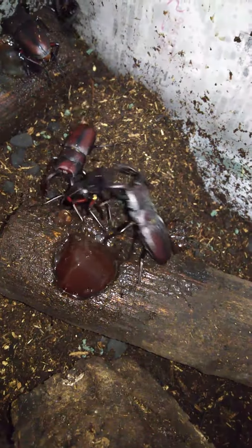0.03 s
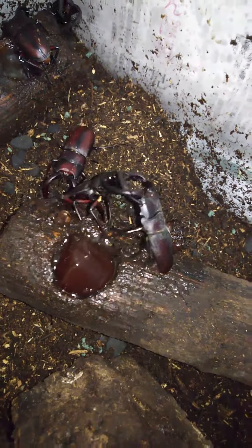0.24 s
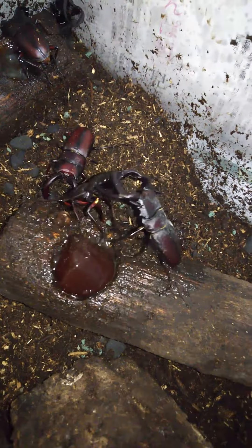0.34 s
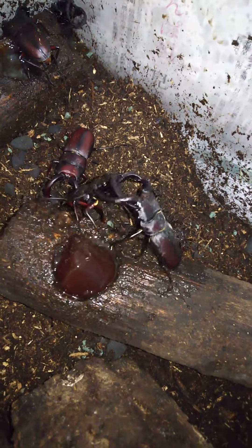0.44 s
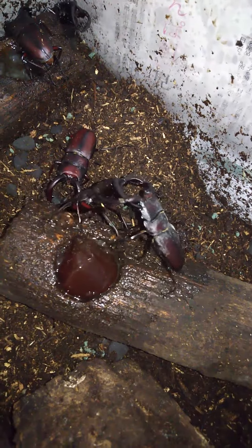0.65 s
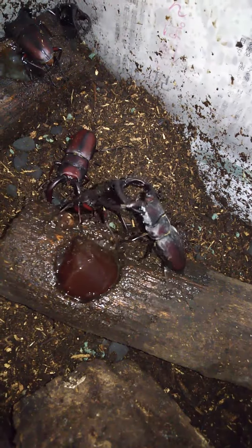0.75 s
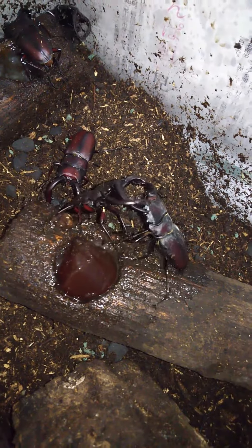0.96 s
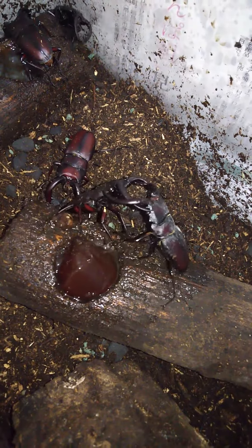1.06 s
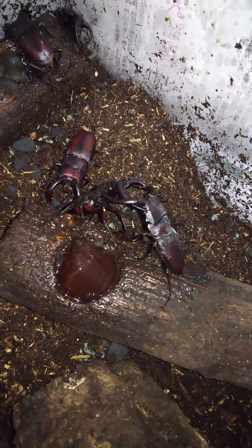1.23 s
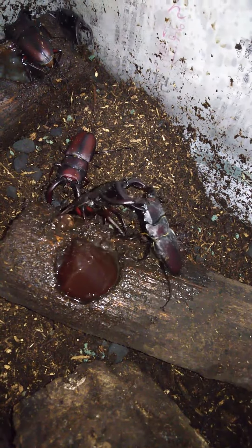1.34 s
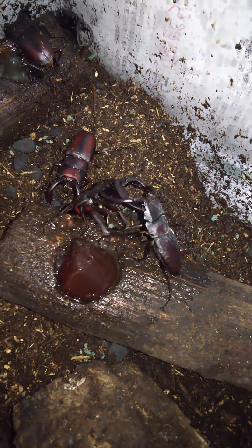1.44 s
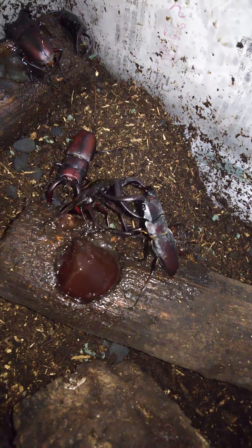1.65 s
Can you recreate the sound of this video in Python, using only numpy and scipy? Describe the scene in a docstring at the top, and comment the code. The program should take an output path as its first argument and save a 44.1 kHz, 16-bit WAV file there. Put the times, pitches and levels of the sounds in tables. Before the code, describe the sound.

Dry snaps and small clicks of two beetles wrestling on a log, heard up close.

```python
"""Stag beetles wrestling on a log

A quiet room, a stereo microphone close to two beetles. Their jaws slip and snap, ringing jaw and
shell, and the hardest snap knocks on the wood. Claws tick and scrape on the bark; there is one small
wet plop. The room answers each click with a short bright tail, over a low hum, faint hiss and a few
soft bumps."""
import sys
import numpy as np
from scipy import signal
from scipy.fft import rfft, irfft
from scipy.io import wavfile
from scipy.ndimage import uniform_filter1d

SR = 44100
rng = np.random.default_rng(int(sys.argv[2]) if len(sys.argv) > 2 else 0)


def generate_wav(sig):
    """Save sig (samples, or channels by samples) to the path in sys.argv[1] as 16-bit PCM at SR."""
    pcm = np.round(np.clip(np.atleast_2d(sig).T, -1, 1) * 32767).astype(np.int16)
    wavfile.write(sys.argv[1], SR, pcm)


N = 74970

# room tone spectrum: f/Hz, relative density/dB
ROOM_TONE = [(20, -31), (45, -9), (70, -5.5), (115, -0.5), (160, -9), (250, -11), (400, -15.5), (800, -19),
             (2000, -23), (5000, -26.5), (8000, -35), (11000, -39), (15000, -45), (16000, -56)]
# how alike the room tone is in the two channels: f/Hz, correlation
TONE_CORRELATION = [(60, 0.64), (180, 0.61), (550, 0.043), (1650, -0.043), (4970, -0.04), (15000, -0.1)]
# its lean to the left: f/Hz, left minus right/dB
TONE_BALANCE = [(60, 3), (180, 2.0), (550, 0.5), (1650, 0.5), (4970, 0.5), (15000, 1)]
# soft low bumps: t/s, f/Hz, left level/dB, length/s
BUMPS = [(0.067, 74.7, -54, 0.056), (0.26, 67.94, -47, .045), (0.381, 65.4, -48, 0.058),
         (0.437, 63, -46.5, 0.056), (0.75, 65.6, -53, 0.053), (1.12, 70, -55, 0.052)]
# the room's tail: f/Hz, level/dB, t60/s
ROOM_TAIL = [(200, -15.5, 0.22), (1200, -13.5, 0.12), (2750, -12.5, 0.26), (4457, -16, .26),
             (7400, -9, 0.25), (9500, -11.5, .22), (11890, -13, 0.19), (14920, -12, 0.27)]
# resonances that stand out of the tail: f/Hz, width/Hz, lift/dB
ROOM_PEAKS = [(2300, 150, 6.5), (2870, 220, 2.5), (4550, 300, 1.5), (7050, 200, 3)]
# colour of the microphone ports: f/Hz, left/dB, right/dB
MIC_PORTS = [(1000, 2.5, 0), (3120, -6, 1.5), (4460, 3, -5), (6020, -0.5, -1.5), (8050, -4.5, -5.5),
             (9560, 0, 3), (10300, -3, 4), (11500, 3, -7), (14400, -5, -8), (16300, -5.5, -11.5)]
# claws dragging: t/s, length/s, level/dB
SCRAPES = [(.065, 0.13, -76), (1.38, 0.042, -74), (1.629, 0.078, -66.5)]
# spectrum of a drag: f/Hz, relative level/dB
SCRAPE_SPECTRUM = [(500, -12), (2000, 0), (3500, -8), (4300, 6), (6200, 8), (10000, 2), (15000, -16)]
# bands of a claw tick: f/Hz
TICK_BANDS = [1000, 3500, 8000, 13500]
# claws on bark: t/s, level/dB in each of TICK_BANDS, rattle t60/s, contact resonances [(f/Hz, lift/dB)]
CLAW_TICKS = [(0.012, -38, -27, -23.5, -38, 0.0063, []), (0.0377, -29, -34, -25.5, -41, 0.013, []),
              (0.07, -23.5, -25, -30, -45, 0.015, []), (0.0733, -25.5, -23, -30, -63, 0.007, [(2420, 6)]),
              (0.1217, -18, -22, -23.5, -26, 0.019, [(2150, 8.6), (3370, 11.2), (6300, 6.4)]),
              (0.1242, -24.5, -25, -32, -59, 0.023, []), (0.2082, -42, -32, -35, -33, 0.016, []),
              (0.3724, -18.5, -23, -18.5, -25.5, 0.0094, [(1000, 8.5), (6350, 6.5), (8100, 5.4)]),
              (0.3787, -48, -22.5, -31, -37, 0.018, []),
              (0.431, -37.5, -28.5, -25.5, -38, 0.018, [(5320, 7)]), (0.492, -39, -36, -34, -49, 0.015, []),
              (0.5117, -40, -32.5, -26, -41.5, .008, [(5320, 8)]),
              (0.5475, -39, -34.5, -35.5, -49, 0.014, []), (0.6204, -47, -49.5, -32.5, -47, .008, []),
              (0.737, -27, -27.5, -25, -36, .011, [(2200, 8), (6300, 6)]),
              (0.755, -47.5, -31, -33, -45.5, 0.0067, []), (.8680, -36.5, -36.5, -33, -44.5, .01, []),
              (0.879, -42, -40.5, -33.5, -46, .01, []), (0.9378, -43, -28.5, -34, -56, 0.0043, []),
              (0.9676, -37, -29, -35, -45, .01, []), (1.0486, -50, -39, -30, -39, .014, []),
              (1.0606, -27, -27.5, -26, -35, 0.0091, [(1730, 12), (8540, 6)]),
              (1.1620, -32, -28.5, -25.5, -34, 0.013, []), (1.3834, -65, -33.5, -34, -48, 0.0076, []),
              (1.3890, -40.5, -45, -40, -41, .012, []), (1.404, -45, -35.5, -34.5, -46.5, 0.01, []),
              (1.629, -37, -34, -29.5, -48, 0.011, []), (1.6523, -42, -41.5, -38, -46, .025, [(6300, 9)]),
              (1.6684, -29, -33, -27, -48, 0.013, [(4250, 7)]), (1.6752, -47, -30.5, -16.5, -44, .008, []),
              (1.6778, -35, -30, -21.5, -39, 0.011, []), (1.682, -57, -30, -27, -39, 0.025, [(4230, 12)]),
              (1.688, -39, -50, -28, -44, .01, []), (1.6955, -36, -33, -31, -52, 0.022, [])]
# spectrum of the knock on the log: f/Hz, left/dB, right/dB
LOG_KNOCK = [(30, 12.5, -9.5), (119.2, 10, 1.5), (295.7, 6.5, 4.5), (600, -5.5, 5.5), (1050, -1, 10),
             (1600, -4.5, 10.5), (2143, -8, -5.5), (4013, -26, -11)]
# resonances of jaw and shell: f/Hz, width/Hz, lift/dB
SHELL_PEAKS = [(1970, 220, -1), (2870, 440, 2.5), (4315, 440, 4.5), (5870, 500, 1), (7940, 1100, -1),
               (9550, 900, 3)]
# bands of a jaw snap: f/Hz
SNAP_BANDS = [900, 1900, 3500, 5500, 9500, 14000]
# jaw snaps: t/s, level/dB in each of SNAP_BANDS, rattle against crack/dB, rattle t60/s,
# room send/dB, contact resonances [(f/Hz, lift/dB)]
JAW_SNAPS = [(0.2196, -24.5, -3.5, 4.5, -2.5, -7, -12.5, -1, 0.012, -5, [(2230, 2.5), (3750, 3.5),
             (8700, 5)]), (0.2498, -11.5, -0.5, 6, 8, 9, -3, 2, .0095, 0.6, [(2900, 5), (6050, 3),
             (8550, 2)]), (1.1133, -23, -25.5, -19, -13.5, -14.5, -22, 3.5, 0.0089, -4.5, [(2270, 11),
             (3300, 3), (4400, 4.6), (5200, 9), (6700, 5)])]

CONTACT_WIDTH_HZ, BASS_CUT_DB_PER_OCTAVE = 330, 2.5
RATTLE_RISE_S, RIGHT_LAG_S = 0.0001, 0.00013
NEAR_DB, NEAR_T60_S = -20.5, 0.034  # reflections off nearby surfaces just after each click


def amp(db):
    """Decibels to gain."""
    return 10 ** (np.asarray(db) / 20)


def unit(x):
    """Scales to rms 1."""
    return x / np.sqrt(np.mean(x ** 2) + 1e-20)


def curve(table, hz, column=1):
    """Interpolates one column of a table on a log-frequency axis."""
    table = np.array(table, float)
    return np.interp(np.log(hz + 1), np.log(table[:, 0] + 1), table[:, column])


def add(mix, start_s, sound):
    """Mixes a sound in at start_s."""
    part = mix[:, max(round(start_s * SR), 0):][:, :sound.shape[-1]]
    part += sound[..., :part.shape[1]]


def bins(size=4096):
    """Frequencies of a spectrum."""
    return np.fft.rfftfreq(size, 1 / SR)


def lifts(peaks):
    """The dB spectrum of a set of resonances: f/Hz, width/Hz, lift/dB."""
    return sum(db / (1 + (2 * (bins() - hz) / width) ** 2) for hz, width, db in peaks)


def ring(db):
    """Minimum-phase impulse response of a dB spectrum."""
    log_gain = np.log(amp(np.r_[db, db[-2:0:-1]]))
    return np.fft.ifft(np.exp(np.conj(signal.hilbert(log_gain)))).real


def mic_ports(left_db, right_db):
    """Impulse responses of a left and a right spectrum, coloured by the microphone ports."""
    return np.array([ring(left_db + curve(MIC_PORTS, bins(), column=1)),
                     ring(right_db + curve(MIC_PORTS, bins(), column=2))])


def room_tone(noise_db=-59, hum_db=-66, hum_hz=101.8, waver_hz=7):
    """The quiet room: steady rumble, wide hiss and a wavering low hum in the centre."""
    hz = bins(size=N)
    draws = rng.standard_normal((4, len(hz)))
    left, independent = draws[::2] + 1j * draws[1::2]
    alike = curve(TONE_CORRELATION, hz)
    right = alike * left + np.sqrt(1 - alike ** 2) * independent
    balance = amp(np.outer([.5, -.5], curve(TONE_BALANCE, hz)))
    noise = irfft(np.array([left, right]) * balance * amp(curve(ROOM_TONE, hz)), N)
    waver = unit(uniform_filter1d(rng.standard_normal(N), size=2500))
    hum = np.sin(2 * np.pi * np.cumsum(hum_hz + waver_hz * waver) / SR)
    return amp(noise_db) * unit(noise) + amp(hum_db) * unit(hum)


def bumps(right_db=-4):
    """Soft low bumps of a few cycles, left of centre."""
    out = np.zeros((2, N))
    for start_s, hz, db, length in BUMPS:
        t = np.arange(0, length, 1 / SR)
        bump = np.sin(np.pi * t / length) * np.sin(2 * np.pi * hz * t)
        add(out, start_s, amp([[db], [db + right_db]]) * bump)
    return out


def room_tail(send, gap_s=0.0057, rise_s=0.0078, size=22050):
    """The room's diffuse answer builds up after a short gap, each band dying at its own speed."""
    hz, t, spectra = signal.stft(rng.standard_normal((2, size)), SR, nperseg=256)
    decay = amp(-60 * t / curve(ROOM_TAIL, hz, column=2)[:, None])
    tail = signal.istft(spectra * decay, SR, nperseg=256)[1]
    tail *= np.clip((np.arange(tail.shape[1]) / SR - gap_s) / rise_s, 0, 1)
    colour_db = curve(ROOM_TAIL, bins()) + lifts(ROOM_PEAKS)
    tail = signal.fftconvolve(tail / np.linalg.norm(tail[0]), mic_ports(colour_db, colour_db), axes=1)
    return signal.fftconvolve(send, tail, axes=1)[:, :N]


def plop(start_s=0.1826, from_hz=2170, to_hz=213, glide_s=0.001706, length_s=0.012, db=-50):
    """One small wet plop whose pitch drops quickly."""
    out = np.zeros((2, N))
    t = np.arange(0, length_s, 1 / SR)
    hz = to_hz + (from_hz - to_hz) * np.exp(-t / glide_s)
    envelope = np.sqrt(np.sin(np.pi * t / length_s))
    add(out, start_s, amp(db) * envelope * np.sin(2 * np.pi * np.cumsum(hz) / SR))
    return out


def claw_scrapes(slips_per_s=1200):
    """Claws drag over the grain of the wood in showers of tiny slips."""
    out = np.zeros((2, N))
    slip_response = ring(curve(SCRAPE_SPECTRUM, bins()))[None]
    for start_s, length, db in SCRAPES:
        size = round(length * SR)
        slips = rng.standard_normal((2, N)) * (rng.random(N) < slips_per_s / SR)
        drag = signal.fftconvolve(slips[:, :size], slip_response)[:, :size]
        add(out, start_s, amp(db) * unit(drag) * signal.windows.tukey(size))
    return out


def click(band_hz, band_db, contact, t60, rattle_db, room_db, size=2048):
    """A crack and a brief dense rattle ring shell and contact point. Rows: left, right, room send."""
    hz, t = bins(), np.arange(size) / SR
    octaves_below = np.log2(np.maximum(band_hz[0] / (hz + 20), 1))
    colour_db = curve(list(zip(band_hz, band_db)), hz) - BASS_CUT_DB_PER_OCTAVE * octaves_below
    colour_db += lifts(SHELL_PEAKS)
    contact_db = lifts([(f, CONTACT_WIDTH_HZ, db) for f, db in contact])
    decay = amp(-60 * t / t60) + amp(NEAR_DB - 60 * t / NEAR_T60_S)
    rattle = rng.standard_normal((2, size)) * decay * (1 - np.exp(-t / RATTLE_RISE_S))
    crack = t == 0
    force = crack + amp(rattle_db) * rattle / np.linalg.norm(rattle, axis=1, keepdims=True)
    # level out the force's broad spectrum, so the rattle adds texture without changing the colour
    force_db = 10 * np.log10(uniform_filter1d(abs(rfft(force, 2 * size)) ** 2, size=45))
    left_db, right_db = colour_db + contact_db - force_db
    left, right = signal.fftconvolve(force, mic_ports(left_db, right_db), axes=1)[:, :2 * size]
    return np.array([left, np.roll(right, round(RIGHT_LAG_S * SR)), ring(colour_db + room_db)])


def claw_ticks():
    """Light ticks on the bark; some of them ring the spot they strike."""
    out = np.zeros((3, N))
    for start_s, *band_db, t60, contact in CLAW_TICKS:
        add(out, start_s, click(TICK_BANDS, band_db, contact, t60, rattle_db=9, room_db=-2.5))
    return out


def log_knock(start_s=0.25):
    """The hardest snap jolts the log, heard in opposite polarity left and right."""
    out = np.zeros((2, N))
    left = ring(curve(LOG_KNOCK, bins(), column=1))
    right = ring(curve(LOG_KNOCK, bins(), column=2))
    add(out, start_s, np.array([left, -right]))
    return out


def jaw_snaps():
    """Jaws slip and snap close to the microphone; each point of contact has its own resonances."""
    out = np.zeros((3, N))
    for start_s, *band_db, rattle_db, t60, room_db, contact in JAW_SNAPS:
        add(out, start_s, click(SNAP_BANDS, band_db, contact, t60, rattle_db, room_db))
    return out


def scene():
    """The beetles up close, the room behind them."""
    clicks = jaw_snaps() + claw_ticks()
    direct, send = clicks[:2], clicks[2:]
    return direct + room_tail(send) + log_knock() + claw_scrapes() + plop() + bumps() + room_tone()


def record(dry, cutoff_hz=16200):
    """The recorder's band limit cuts off the top treble."""
    lowpass = signal.firwin(255, cutoff_hz, window=("kaiser", 9), fs=SR)
    return signal.oaconvolve(dry, lowpass[None], "same")


dry = scene()
out = record(dry)
generate_wav(out)
```